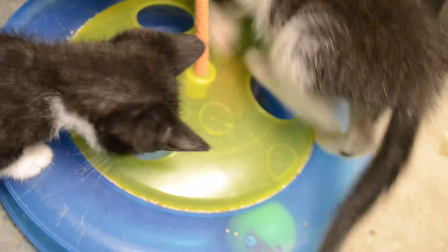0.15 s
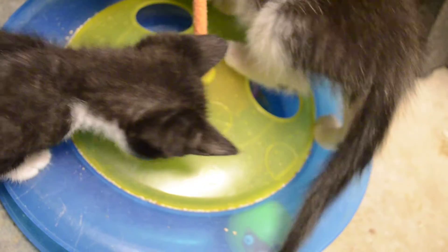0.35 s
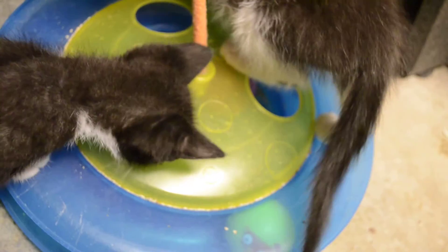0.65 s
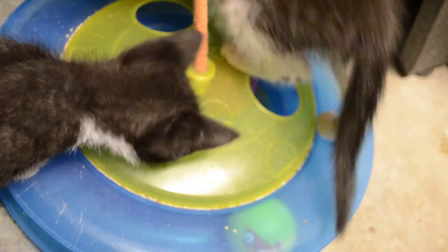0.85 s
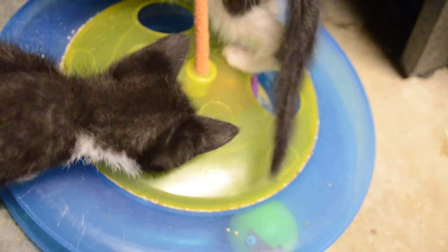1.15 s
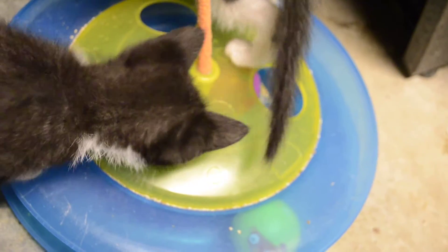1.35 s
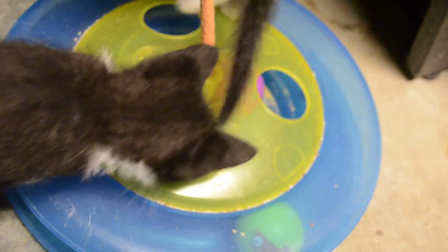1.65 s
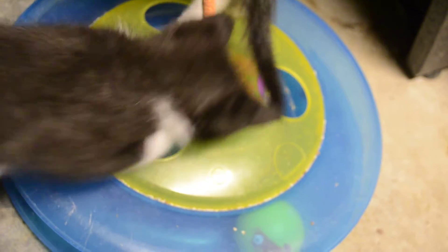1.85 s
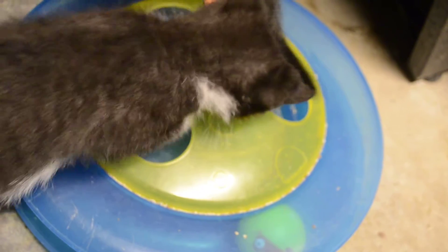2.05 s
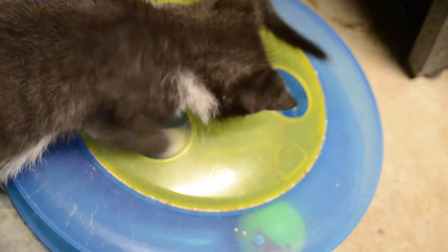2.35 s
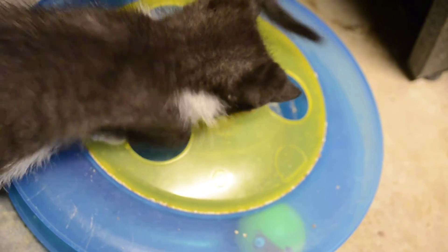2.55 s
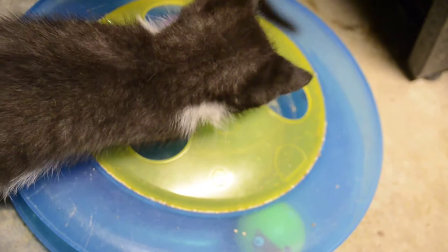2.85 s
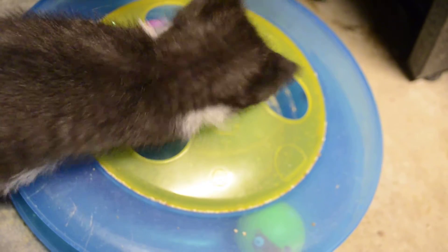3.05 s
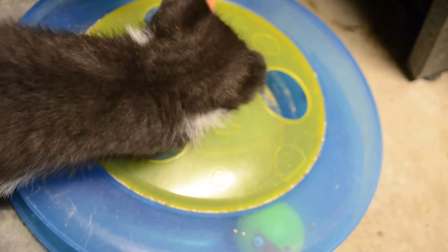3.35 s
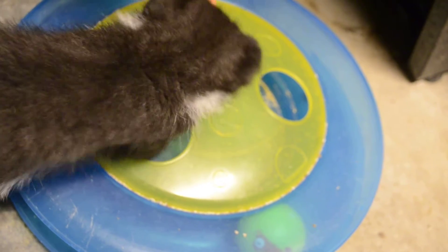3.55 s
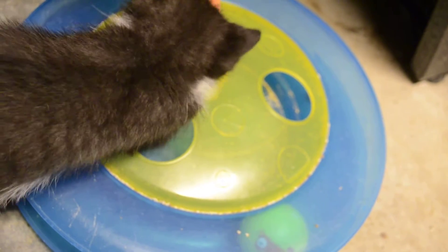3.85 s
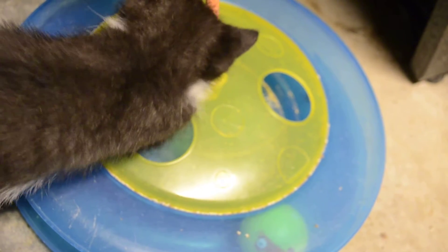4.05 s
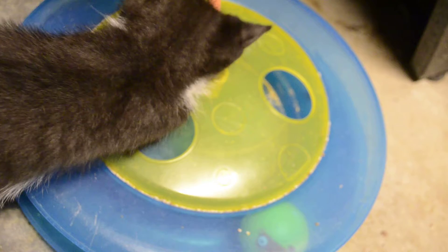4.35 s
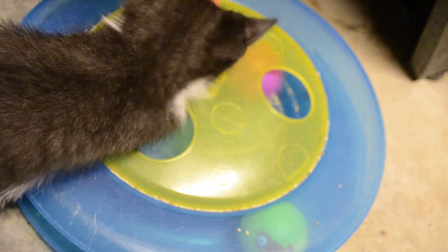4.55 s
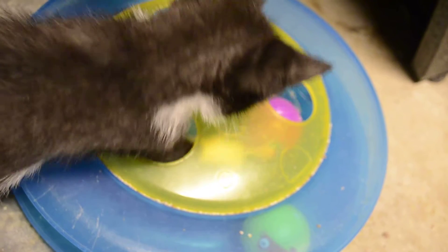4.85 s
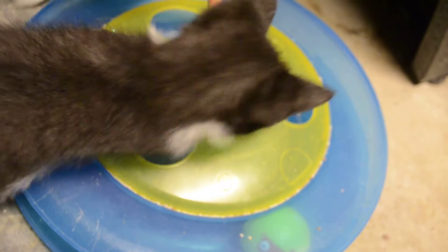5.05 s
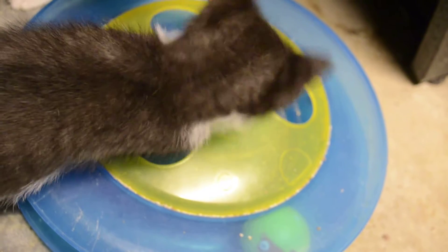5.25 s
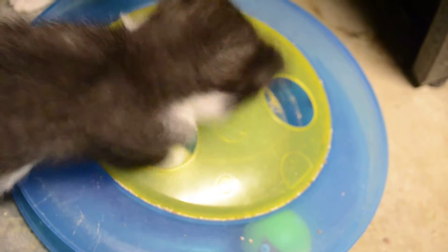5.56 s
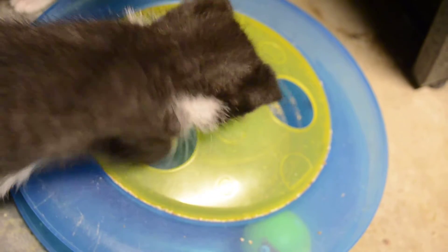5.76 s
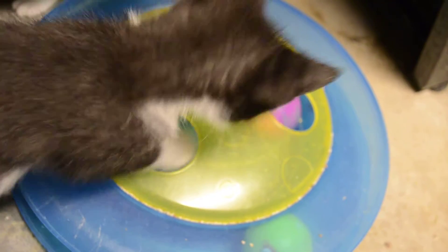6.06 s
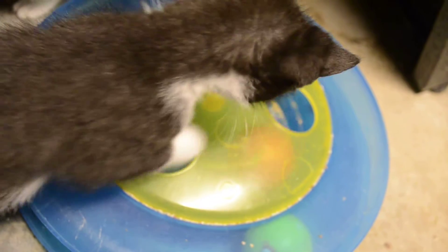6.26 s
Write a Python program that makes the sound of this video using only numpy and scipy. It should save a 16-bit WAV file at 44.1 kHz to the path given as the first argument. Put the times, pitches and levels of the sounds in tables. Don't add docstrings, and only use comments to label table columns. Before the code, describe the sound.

A light plastic ball knocks, rattles and rolls inside a hollow plastic toy while claws tick on it, over a steady ventilation hum.

```python
import sys
import numpy as np
from scipy import signal
from scipy.fft import rfft, irfft
from scipy.io import wavfile
from scipy.ndimage import uniform_filter1d

SR = 44100
rng = np.random.default_rng(int(sys.argv[2]) if len(sys.argv) > 2 else 0)


def elevation(decibels):
    levels = np.asarray(decibels, float)
    return 10 ** (levels / 20)


def to_wav(sig):
    pcm = np.clip(np.atleast_2d(sig), -1, 1) * 32767
    pcm = np.round(pcm).astype(np.int16)
    wavfile.write(sys.argv[1], SR, pcm.T)


N = 282844

# frequency in Hz, density in dB per Hz.
AIR_COLOUR = [(25, -33), (42, -34), (60, -8.5), (82, -8), (102, -4.5), (132, -19), (175, -5), (310, -10),
              (430, -16.5), (1000, -20), (4000, -44.5), (5500, -54.5), (8500, -63), (16000, -69.5)]
# frequency in Hz, width in Hz, rms level in dB.
DUCT_RESONANCES = [(94.1, 2, -48.5), (198.9, 3.6, -44.5), (300, 7.9, -53.5), (855, 19, -53),
                   (2814, 60, -72), (9750, 420, -88), (11750, 490, -84.5)]
# frequency in Hz, level in dB, T60 in seconds.
BELL_MODES = [(9900, -2, .025), (10600, 1, 0.032), (12640, -1, .2), (13900, -6, .025)]
# start in seconds, level in dB.
PELLET_HITS = [
    (6.103, -80),
    (6.112, -68),
    (6.121, -80),
    (6.133, -84),
    (6.146, -80),
]
# middle in seconds, half length in seconds, level in dB.
BRUSHES = [(2.403, .04, -75), (2.563, .03, -68), (2.64, .05, -79), (2.894, .04, -70), (2.96, .02, -78),
           (3.165, .03, -77), (3.248, .02, -72), (3.49, .04, -73), (3.666, 0.044, -72), (3.78, 0.048, -66),
           (4.107, 0.052, -70.5), (4.2, .04, -74), (4.49, 0.034, -78), (4.83, 0.045, -75),
           (4.97, 0.048, -66.5), (5.045, 0.031, -78), (5.235, 0.02, -74), (5.42, 0.05, -80),
           (5.597, 0.036, -66), (5.69, 0.036, -68.5), (5.79, 0.021, -69), (5.86, .03, -83.5),
           (6.04, 0.027, -75), (6.128, 0.032, -73), (6.326, 0.073, -77)]
# start in seconds, peak in dB, share of the thinnest top in dB.
CLAW_TICKS = [(2.266, -48, -22), (2.5458, -53, -2), (2.5798, -52, -15), (2.605, -23.5, -17.5),
              (2.6817, -47, -30), (2.884, -44, -15), (2.9431, -58, -8), (2.96, -42, -11), (3.242, -45, -22),
              (3.459, -43.5, -13), (3.4861, -35, -12), (3.5397, -37, -20), (3.6291, -41, -14.5),
              (3.658, -47, -9.5), (3.7606, -50, -11), (3.783, -56.5, -7), (3.9987, -55, -5),
              (4.071, -45.5, -26), (4.4892, -51, -11), (5.021, -31, -19.5), (5.0276, -28, -14.5),
              (5.228, -53, -10), (5.595, -42.5, -4), (5.628, -37, -21), (5.654, -55, -1.5), (5.684, -62, 8),
              (5.7628, -52.5, -8), (5.8396, -47.5, -9), (6.103, -58.5, -7.5), (6.3907, -51, -8)]
# time in seconds, level in dB.
ROLLING = [(2.3, -60), (2.9, -52), (3.4, -50), (3.64, -44), (3.8, -50), (4.25, -56), (4.59, -41.5),
           (5.06, -56), (5.2, -31.5), (5.41, -37), (5.62, -49.5), (5.77, -35.5), (6.17, -39.5), (6.41, -45)]

# frequency in Hz, level in dB, T60 in seconds.
BASE_MODES = [(373, -5.5, 0.053), (454, -6.5, 0.1), (498.9, -0.5, 0.083)]
LID_MODES = [(597, -4, 0.019), (618.7, 2.5, 0.048), (695, -3.5, 0.057), (799, -15.5, 0.1)]
WALL_MODES = [(930.5, 0, 0.027), (999, -2.5, 0.053), (1074, -1.5, 0.052), (1157, -4.5, 0.043)]
TRACK_MODES = [(1281, 0, 0.031), (1425.5, -3.5, 0.052), (1489, -4, 0.033)]
RIM_MODES = [(1750, 3.5, 0.021), (2113, 9, 0.0098), (2247, 2.5, 0.027), (2453, -27.5, 0.049),
             (2630, -17.5, 0.019), (3006, -10, 0.049), (3245, -13.5, 0.019), (3660, -11.5, 0.05),
             (3810, -21.5, 0.044)]

# start in seconds, strength in dB,
# hardness in dB (how much reaches the rim), spill into the other panels in dB.
BASE_DROPS = [(2.682, -19.5, -4, 3), (2.701, -27, -13, 2), (2.972, -28, -19, -0.5), (3.19, -24, -18, -1.5),
              (3.204, -30.5, -13, 3), (3.405, -16.5, -12, -3.5), (3.538, -16, -6.5, 0.5),
              (3.658, -20, -9, 2.5), (3.997, -21.5, -20, -1.5), (4.016, -38, -7, 2),
              (4.354, -19, -3.5, 3.5), (4.384, -24.5, -23, -13), (4.489, -26, -6.5, 4.5),
              (4.773, -30.5, -12, 3), (4.798, -31.5, -12, 3), (4.823, -30, -13, 3.5),
              (5.095, -25.5, -7.5, -0.5), (5.124, -23, -25, -1.5), (5.179, -31.5, -13, -3.5),
              (5.225, -23.5, -8.5, 4), (5.258, -26.5, -16.5, 0), (5.278, -30.5, -8, 2.5),
              (5.315, -24.5, -17, 2), (5.341, -18, -15, -3), (5.369, -27, -23, -0.5), (5.398, -26, -7, 2),
              (5.418, -22, -22.5, -4.5), (5.448, -28, -13, 0.5), (5.897, -27.5, -7, 2.5),
              (6.162, -26, -17.5, -3)]
# start in seconds, strength, hardness and spill in dB.
LID_STRIKES = [(0.357, -25.5, -14.5, 3.5), (1.951, -42.5, -17, 3), (2.606, -7.5, -8.5, 1.5),
               (2.639, -28, -23, 3), (2.655, -17.5, -12.5, 2.5), (2.898, -23, -13.5, 3),
               (3.017, -35, -16, 3), (3.141, -34.5, -24, 1.5), (3.238, -21, -21, -0.5),
               (3.485, -10, -17.5, -4.5), (4.209, -28, -23, -0.5), (4.473, -24, -15, 4),
               (4.523, -32, -31, 0.5), (4.648, -31, -20, -2.5), (4.662, -29, -22, -3.5),
               (4.748, -36, -22, 0), (5.02, -9.5, -17.5, -9), (5.026, -10, -10, -6), (5.063, -16.5, -23, 0),
               (5.164, -29, -15, 1.5), (5.204, -26.5, -25, 3.5), (5.653, -18.5, -14, 3),
               (5.678, -20, -14, 4), (5.765, -23.5, -12.5, 4), (5.79, -27.5, -14.5, 3),
               (6.04, -18, -21, -5), (6.059, -27, -15, 1), (6.204, -32.5, -12, 3), (6.39, -21.5, -21, 1)]
# start in seconds, strength, hardness and spill in dB.
WALL_BUMPS = [(2.621, -25, -29, -7), (2.726, -38.5, -23, 4), (3.243, -13.5, -21, -5), (3.258, -32, -19, 3),
              (3.458, -14.5, -16, -1.5), (3.471, -16, -30, -5), (3.483, -13, -15, 0),
              (3.629, -13.5, -7.5, -3), (3.785, -21, -13, 1), (3.826, -28, -19, 3.5),
              (4.089, -28.5, -21, -6), (4.417, -34.5, -9, 9), (5.035, -16, -21.5, 2.5),
              (5.046, -27, -25.5, -4), (5.508, -31, -14.5, -0.5), (5.592, -16, -12, -2.5),
              (5.598, -12, -33, -7.5), (5.627, -11, -25, -0.5), (5.631, -15, -10.5, -4),
              (5.71, -25.5, -19, 4.5), (5.81, -33.5, -20, -4), (5.849, -27, -10, 0), (5.993, -25, -12, 1.5),
              (6.124, -33.5, -21, -4), (6.28, -32.5, -18, 4.5), (6.327, -35, -20, 7),
              (6.356, -33.5, -27, 4.5)]
# start in seconds, strength, hardness and spill in dB.
TRACK_CLIPS = [(2.393, -31.5, -8, -1), (2.881, -19, -11.5, -1), (2.96, -23, -11, 1.5),
               (3.626, -15, -18, -0.5), (3.674, -31, -16, -3.5), (3.781, -21, -10.5, 0),
               (3.921, -42.5, -18, 3.5), (4.073, -21.5, -10.5, 2.5), (4.844, -39.5, -24, 7),
               (5.03, -13, -11, -9.5), (5.574, -24, -14, -4), (5.585, -30.5, -0.5, -5.5)]
# level in base, lid, wall and track, all in dB.
PANEL_COUPLING = [(-0.5, -6.5, -3.5, -9.5), (-11, -2.5, -3.5, -10), (-20, -9.5, -0.5, -10),
                  (-7, -5.5, -0.5, -0.5)]


def level(x, db):
    return x * elevation(db) / np.sqrt(np.mean(x ** 2))


def band(x, lo_hz, hi_hz):
    return signal.sosfilt(signal.butter(2, [lo_hz, hi_hz], "band", fs=SR, output="sos"), x)


def ring(x, hz, t60):
    radius = np.exp(-np.log(1000) / (t60 * SR))
    angle = 2 * np.pi * hz / SR
    return signal.lfilter([0, radius * np.sin(angle)], [1, -2 * radius * np.cos(angle), radius ** 2], x)


def pulses(s, size):
    return np.bincount(np.minimum((np.asarray(s) * SR).astype(int), N - 1), size, N)


def fading(s, db, t60):
    return signal.lfilter([1], [1, -np.exp(-np.log(1000) / (t60 * SR))], pulses(s, elevation(db)))


def walk(rate):
    hold = int(SR / rate)
    steps = np.repeat(rng.standard_normal(N // hold + 1), hold)
    return 1.2 * uniform_filter1d(uniform_filter1d(steps, hold), hold)[:N]


def bumps(per_s, spread_db):
    hit = rng.random(N) < per_s / SR
    unevenness = elevation(spread_db * rng.exponential(size=N))
    return level(hit * rng.standard_normal(N) * unevenness, 0)


def hum():
    f = np.fft.rfftfreq(N, 1 / SR) + 1
    hz, db = np.transpose(AIR_COLOUR)
    colour = elevation(np.interp(np.log(f), np.log(hz), db))
    air = irfft(rfft(rng.standard_normal(N)) * colour, N)
    out = level(air, -40) * elevation(0.44 * walk(1.8))
    for hz, width, db in DUCT_RESONANCES:
        tone = ring(rng.standard_normal(N), hz, np.log(1000) / (np.pi * width))
        swell_db = 2.2 if hz < 400 else 0.8
        out = out + level(tone, db) * elevation(swell_db * walk(4.1))
    return out


def room(x):
    t60_s, tail_db, build_up_s = 0.21, -11.5, 0.0054
    t = np.arange(int(0.5 * SR)) / SR
    tail = rng.standard_normal(len(t)) * np.exp(-np.log(1000) * t / t60_s) * (1 - np.exp(-t / build_up_s))
    tail = signal.lfilter([1], [1, -0.5], tail)
    tail = tail / np.sqrt(np.sum(tail ** 2))
    return x + elevation(tail_db) * signal.fftconvolve(x, tail)[:N]


def bell():
    s, db = np.transpose(PELLET_HITS)
    hits = pulses(s, elevation(db))
    return sum(elevation(mode_db) * ring(hits, hz, t60) for hz, mode_db, t60 in BELL_MODES)


def knocks():
    spots = [BASE_DROPS, LID_STRIKES, WALL_BUMPS, TRACK_CLIPS]
    s, db, hard_db, spill_db = np.concatenate(spots).T
    struck = np.repeat(np.arange(len(spots)), [len(rows) for rows in spots])
    elsewhere = 1 - np.eye(len(spots))[struck].T
    panel_db = db + np.array(PANEL_COUPLING)[struck].T + elsewhere * spill_db
    return s, *panel_db, db + hard_db


def ticks(t60=0.027):
    knock_s, *_, rim_db = knocks()
    knock_ticks = [knock_s, rim_db - 30.5, np.full(len(knock_s), -10.0)]
    s, db, top_db = np.hstack([np.transpose(CLAW_TICKS), knock_ticks])
    t = np.arange(N) / SR
    brush = sum(elevation(rub_db) * np.exp(-((t - mid) / half) ** 2) for mid, half, rub_db in BRUSHES)

    low_env = fading(s, db - 4.5, t60) + fading(s, db - 9.5, 0.0074) + elevation(6.5) * brush
    top_env = fading(s, db + top_db - 6.5, t60) + fading(s, db + top_db + 5.5, 0.0093) + brush
    low = band(low_env * bumps(5500, 1.5), 3100, 7020)
    top = band(top_env * bumps(6000, 2.4), 9500, 13000)
    fur = band(elevation(-4.5) * brush * bumps(5000, 2.4), 6500, 14500)
    return low + top + fur


def panel(modes, knock_db, roll, drag_s, spot_db=1.5):
    again_s, again_db = 0.004, -5.5
    s = knocks()[0]
    spot = rng.standard_normal((len(s), len(modes), 5))
    out = 0
    for k, (hz, db, t60) in enumerate(modes):
        size = elevation(knock_db + spot_db * spot[:, k, 0]) * np.sign(spot[:, k, 1])
        first_s = s + drag_s * np.abs(spot[:, k, 2])
        second_s = first_s + again_s * np.abs(spot[:, k, 3])
        second_size = elevation(again_db) * size * np.sign(spot[:, k, 4])
        shaking = pulses(first_s, size) + pulses(second_s, second_size) + roll
        out = out + elevation(db) * ring(shaking, hz, t60)
    return band(out, modes[0][0] / 2.0, modes[-1][0] * 1.58)


def toy():
    s, base_db, lid_db, wall_db, track_db, rim_db = knocks()
    drag_s = 0.0007056 * elevation(-0.35 * wall_db)
    roll_db = np.interp(np.arange(N) / SR, *np.transpose(ROLLING), left=-300)
    rumble = elevation(roll_db)
    over_still_db = roll_db + 59
    scrape = elevation(-63.5 + 0.36 * over_still_db)
    boom = elevation(-50 + 0.92 * over_still_db)
    grain_db = 2.2

    base = panel(BASE_MODES, base_db + 0.5, elevation(-29) * boom * bumps(450, grain_db), drag_s)
    lid = panel(LID_MODES, lid_db + 1.5, elevation(-30) * rumble * bumps(330, grain_db), drag_s)
    wall = panel(WALL_MODES, wall_db - 3, elevation(-34.5) * rumble * bumps(590, grain_db), drag_s)
    track = panel(TRACK_MODES, track_db + 1.0, elevation(-34.5) * rumble * bumps(450, grain_db), drag_s)
    rim = panel(RIM_MODES, rim_db - 7.5, elevation(-31) * scrape * bumps(450, 1.8), drag_s, spot_db=4.5)

    crack_env = fading(s, rim_db - 1.5, 0.048) + fading(s + 2 * drag_s, rim_db - 4, 0.056)
    crack = (crack_env + elevation(-1.0) * scrape) * bumps(7000, 3.0)
    return base + lid + wall + track + rim + band(band(crack, 1400, 3080), 1100, 4030)


def scene():
    return (room(toy() + ticks() + bell()) + hum())[None]


def low_pass(x):
    return signal.sosfilt(signal.butter(12, 15850, fs=SR, output="sos"), x)


def record(dry):
    mix = np.clip(dry, -1, 1)
    return low_pass(mix)


dry = scene()
out = record(dry)
to_wav(out)
```